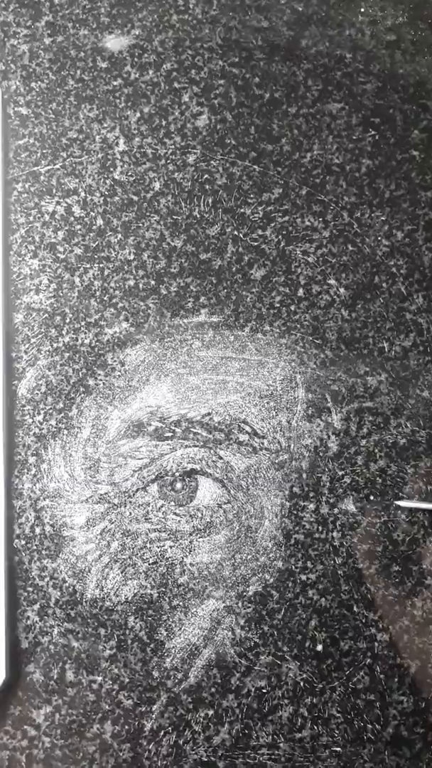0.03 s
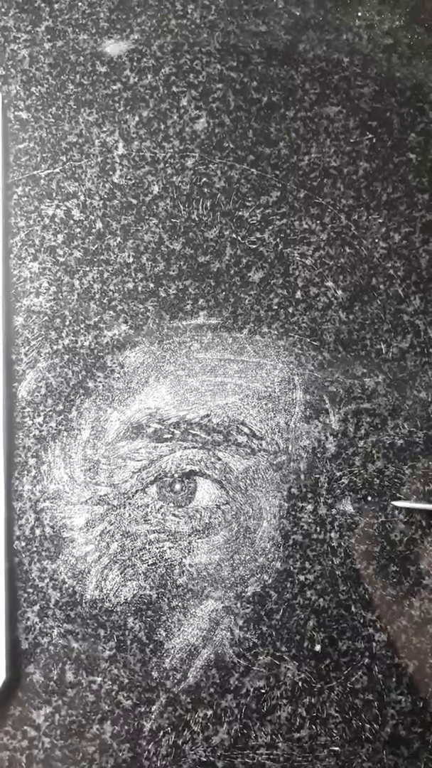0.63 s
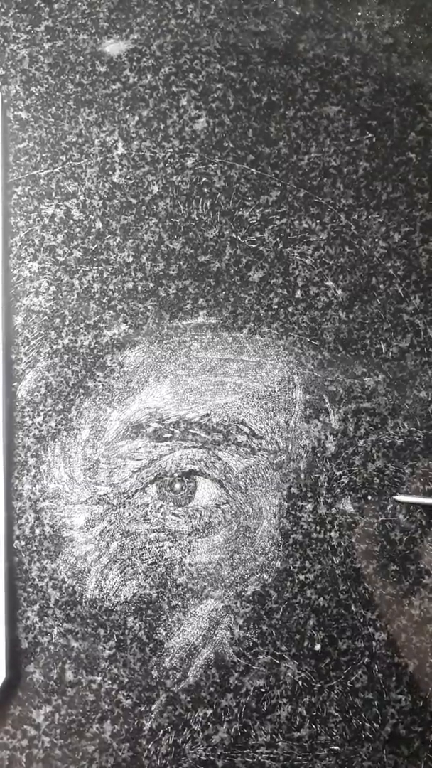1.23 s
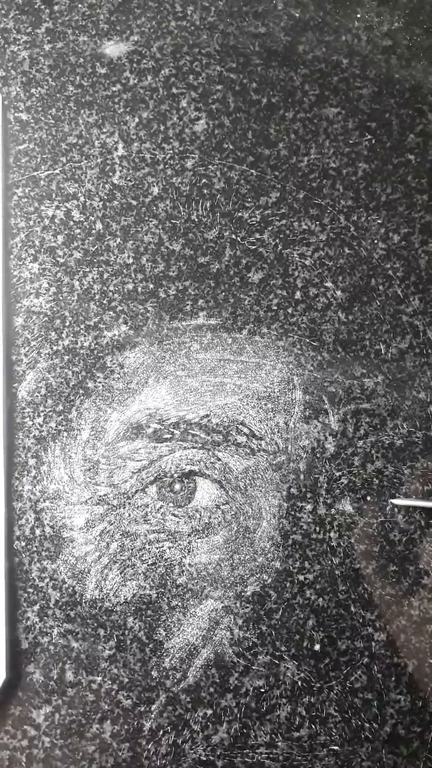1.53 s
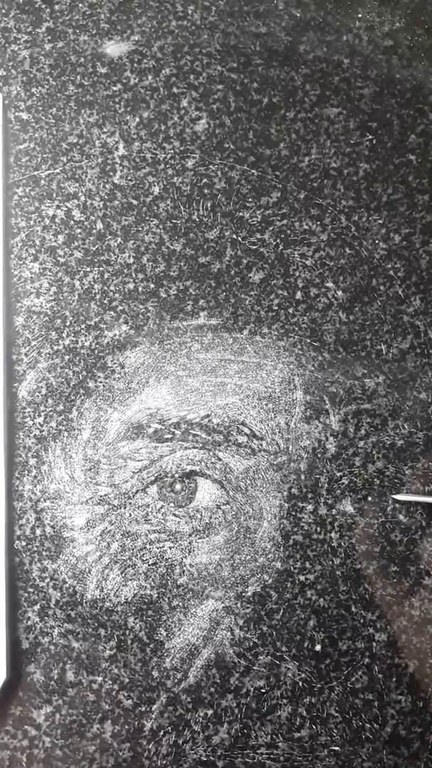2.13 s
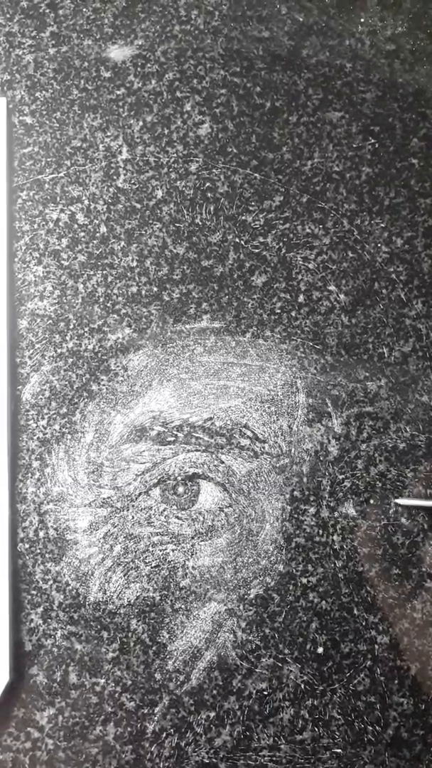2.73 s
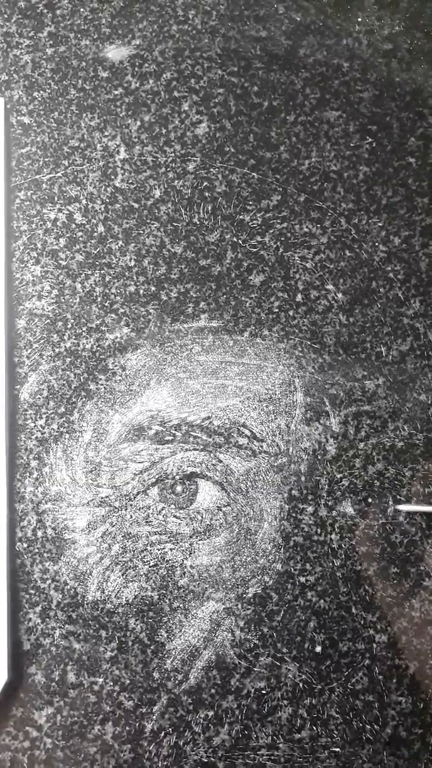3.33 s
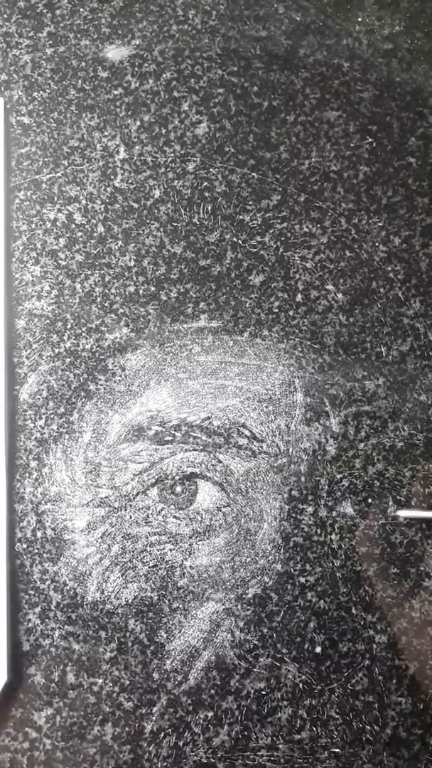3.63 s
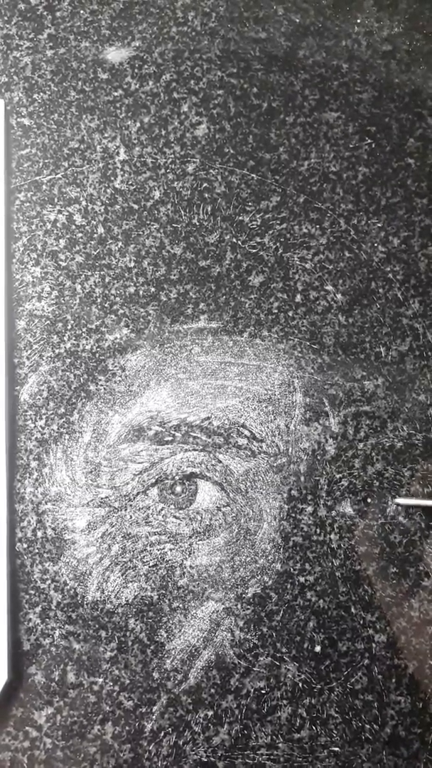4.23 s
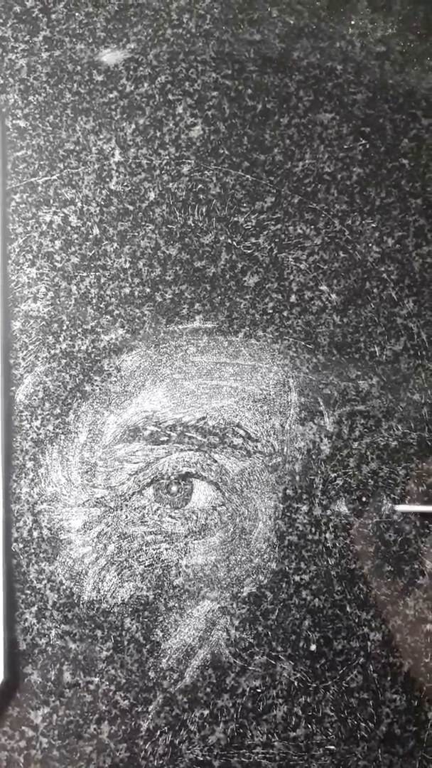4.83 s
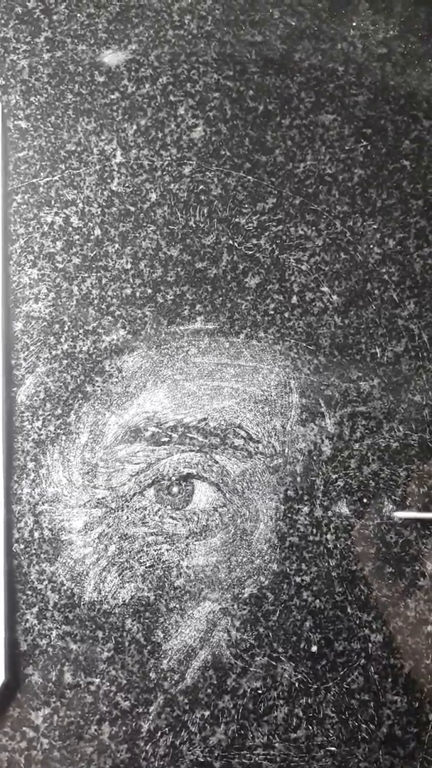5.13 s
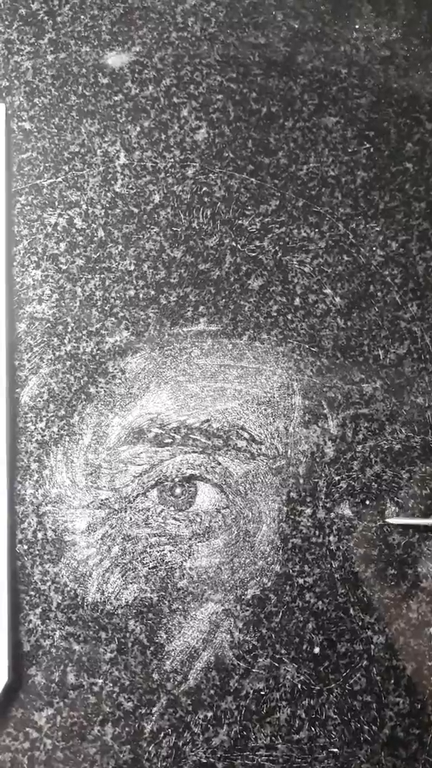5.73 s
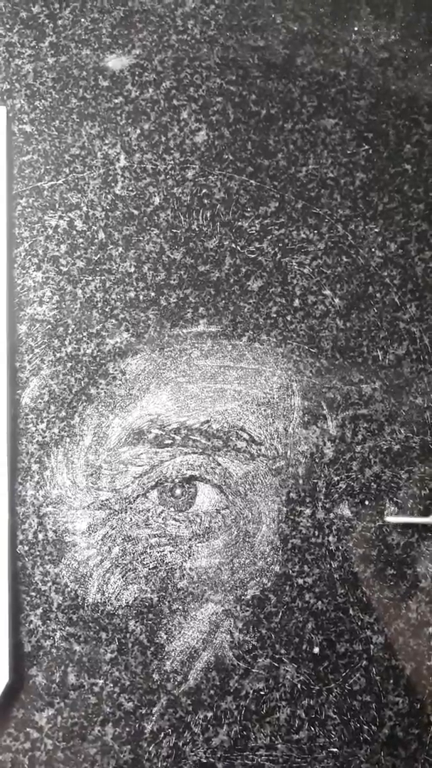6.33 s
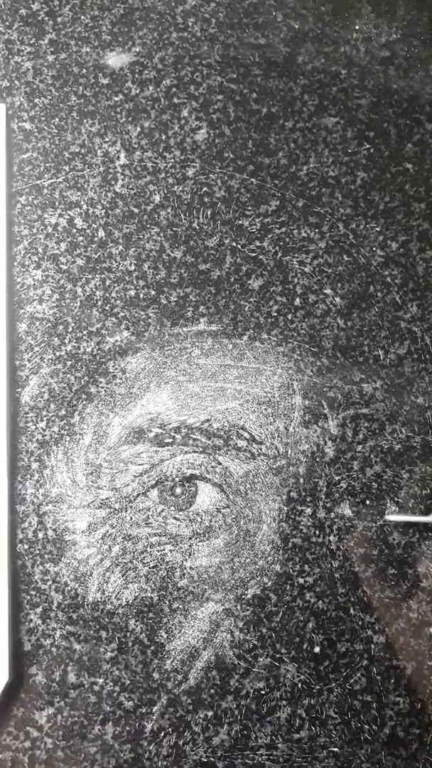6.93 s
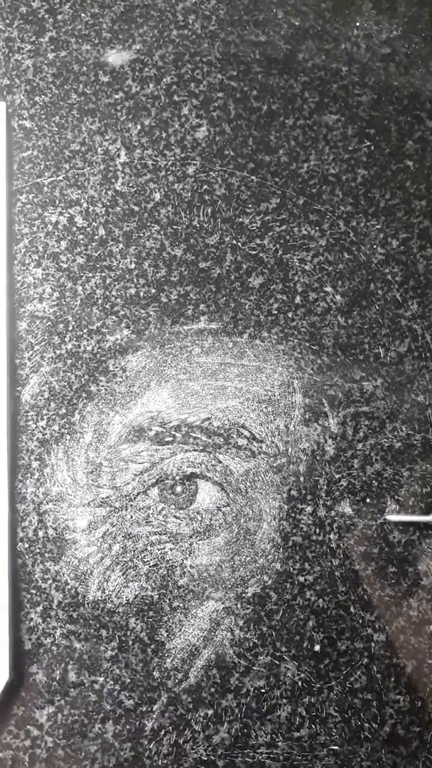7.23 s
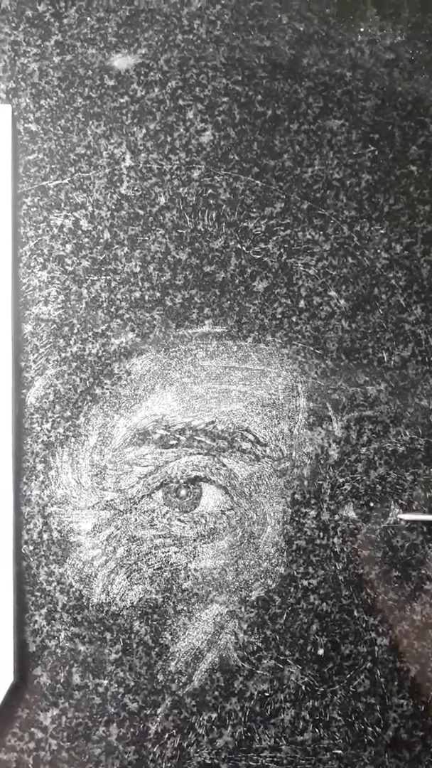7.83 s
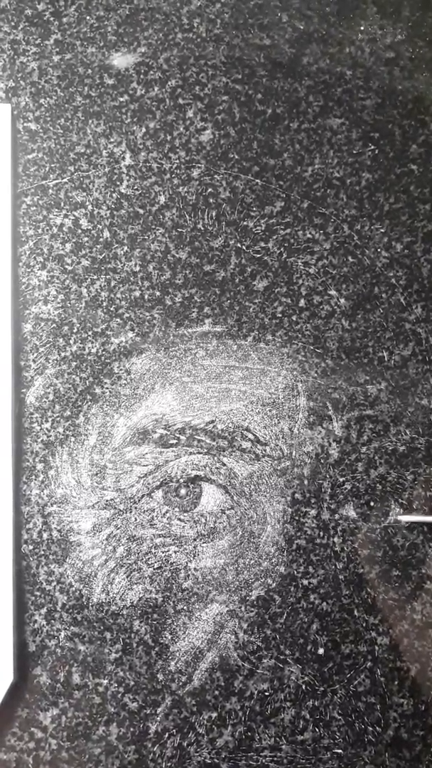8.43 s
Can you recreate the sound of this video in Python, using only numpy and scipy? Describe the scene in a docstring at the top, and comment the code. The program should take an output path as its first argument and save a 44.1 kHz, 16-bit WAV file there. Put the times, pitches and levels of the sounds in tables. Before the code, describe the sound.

A harsh, high metallic buzz from a small engraving tool continues at a steady pitch and nearly even loudness, close to the microphone. Short scratches come several times a second as the vibrating tip pecks at stone, then grow sparser and more uneven toward the end. Light chatter from the tool and a weak hum blend in, over faint noise in a small room.

```python
"""A hard metallic buzz, rasping in short scratches: an impact engraver stipples a stone slab in a small room.
Magnetic pull peaks twice per mains cycle, and each time the armature slams into its stop, exciting the
housing's resonances and setting loose parts chattering. The tip pecks the stone just before each slam,
louder as the hand presses. The coil hums, and brief reverberation fills the gaps over faint room noise."""
import sys
import numpy as np
from scipy import signal
from scipy.fft import rfft, irfft
from scipy.io import wavfile
from scipy.ndimage import uniform_filter1d

SR = 44100
rng = np.random.default_rng(int(sys.argv[2]) if len(sys.argv) > 2 else 0)


def wrap_up_sound(samples):
    """Save the sound to the file named by the first command line argument, as 16-bit audio."""
    columns = np.atleast_2d(samples).T
    # keep every value between -1 and 1, then stretch to whole-number steps
    tamed = np.clip(columns, -1, 1)
    steps = np.round(tamed * 32767).astype(np.int16)
    wavfile.write(sys.argv[1], SR, steps)


N = 377937

# Hum of coil and slab, by harmonic of the stroke rate. Each row: left and right level in dB at full
# transmission, share that travels through the tip (0-1), pressure at which that path is 76% open.
HUM_HARMONICS = [(-61, -60, 0.38, 0.57), (-58, -54, 1, 0.93), (-85, -50, 0.7, 0.28), (-92, -71.5, .4, .5),
                 (-82, -50.5, 0.83, 1.4), (-69, -56, 0, .5), (-73, -93, 0.6, .5), (-50, -51.5, 1, 1),
                 (-49.5, -50, 0.9, 0.38), (-66.5, -75, 0.8, .5), (-40, -39, 0.97, 1.8)]
# Swells of a faint tone at 2.5 times the stroke rate. Each row: start and length in seconds, level in dB.
HALF_ORDER_SWELLS = [(6.3, 0.47, -58), (7.05, 0.41, -56), (7.48, 0.49, -57)]
# Spectrum of the room noise. Each row: frequency in Hz, relative level in dB.
AIR_SPECTRUM = [(20, -4), (60, -3.5), (130, -5.5), (260, 1.5), (600, -9.5), (2000, 12.5), (16000, 0.5)]
# The hand pushing the tip onto the stone. Each row: start and length in seconds, pressure in dB.
PUSHES = [(.03, 0.1, -4), (.28, 0.082, -16.5), (.45, 0.38, -5.5), (.87, 0.12, -4), (1.06, 0.11, -4.5),
          (1.32, 0.072, -4.5), (1.5, 0.11, -4.5), (1.66, 0.13, -7.5), (1.92, 0.064, -13), (2.12, 0.09, -11),
          (2.31, .11, -7.5), (2.51, .13, -6.5), (2.77, 0.077, -2), (2.97, 0.095, -4.5), (3.14, 0.13, -3),
          (3.37, 0.13, -1.5), (3.55, 0.11, 1.5), (3.74, 0.11, -1), (3.96, 0.1, -1), (4.12, 0.11, 0.5),
          (4.32, 0.092, -2.5), (4.48, 0.078, 1.5), (4.65, 0.14, -0.5), (4.84, 0.13, 0.5), (5.06, .11, -2.5),
          (5.23, .12, -1.5), (5.49, 0.058, -9), (5.65, 0.2, -10), (5.93, .08, -17), (6.13, 0.17, -7),
          (6.44, 0.12, -11), (6.88, 0.2, -7.5), (7.2, 0.42, -6), (7.62, 0.097, 1), (8.08, 0.085, -4),
          (8.2, .16, -1), (8.45, .07, -7)]
# Weight of the hand between pushes. Each row: time in seconds, pressure in dB.
RESTING_PRESSURE = [(0, -18.5), (1, -17), (1.3, -22), (2.7, -19), (3, -10), (5.3, -10.5), (5.4, -20.5),
                    (6.2, -22), (6.8, -30), (7, -7.5), (7.7, -12), (7.8, -37), (8, -38), (8.3, -10),
                    (8.55, -20)]
# Spells of stronger limping, strokes early and late by turns. Each row: start and length in seconds,
# timing swing in dB above the usual.
LIMP_SPELLS = [(.16, 0.13, 12.5), (2.02, 0.13, 7), (5.84, 0.095, 14.5), (6.55, 0.27, 10), (7.75, 0.29, 8.5)]
# Response of the slab to the tip. Each row: frequency in Hz, left and right relative gain in dB.
STONE_SPECTRUM = [(69, -24, -35), (312, -21, -11), (710, -17, -21), (903, 1.5, -2.5), (1060, -2, 1.5),
                  (1400, 2, 7.5), (1510, 8, 3.5), (2160, -0.5, -2), (3220, -21, 4.5), (4570, 15, 3),
                  (7140, -2.5, 7), (7900, -23, -10), (10500, -18, -5.5), (16000, -40, -30)]
# Resonances of the housing. Each row: frequency and width in Hz, left and right relative gain in dB.
HOUSING_MODES = [(1007, 290, 8.5, -1), (1487, 424, -28, 12.5), (2617, 425, 19.5, 25.5),
                 (3550, 230, -5, 14.5), (4110, 1280, 17.5, 10), (5228, 612, 28.5, 13.5),
                 (5560, 230, 20.5, 14), (6570, 350, -23.5, 16), (7200, 330, -31, 12.5), (9620, 340, -6, 10),
                 (11230, 1200, 6, -21), (14000, 1100, -16, 2.5), (15400, 440, -14, 3)]
# Sizzle of loose metal. Each row: frequency in Hz, left and right relative gain in dB.
CHATTER_SPECTRUM = [(203, -43, -22), (1380, -5, 3.5), (2540, 8.5, -7.5), (4240, 9, 4), (5820, 6.5, 14),
                    (6070, -7, 11), (8300, -3, -4), (9400, -2, -2.5), (9600, 0, -10), (10600, -2.5, -12),
                    (11600, 0, 2.5), (12700, -5.5, -1), (15000, 0, -13), (15700, 1.5, -16)]
# Spectrum of the reverberation. Each row: frequency in Hz, relative gain in dB.
ROOM_SPECTRUM = [(100, -24), (500, -27.5), (900, -6), (1400, -5), (2100, -9), (2650, 7.5), (3200, -0.5),
                 (4300, 3), (5000, 0.5), (6500, -8.5), (8200, -19.5), (11500, -15), (14500, -15),
                 (16000, -14)]

STROKE_HZ, FIRST_SLAM_S = 100.0476, .0091
PRESS_S, LIFT_S = 0.042, 0.046  # the hand bears down, and lets go
TOP_HZ, FFT_SIZE = 15850, 2048
FREQS = np.maximum(np.fft.rfftfreq(FFT_SIZE, 1 / SR), 1)


def undb(db):
    """Amplitude grows tenfold for every 20 dB."""
    return 10 ** (np.asarray(db) / 20)


def level(x, db):
    """Normalisation to an rms level in dB."""
    return x * undb(db) / np.sqrt(np.mean(x ** 2))


def colour(table, column=1):
    """A spectral envelope: gain interpolated in dB over log frequency."""
    rows = np.array(table)
    return undb(np.interp(np.log(FREQS), np.log(rows[:, 0]), rows[:, column]))


def ring(x, gain, smear_s=0):
    """Minimum-phase filtering with dispersion: the added delay grows to `smear_s` at TOP_HZ."""
    cepstrum = irfft(np.log(gain + 1e-6))
    cepstrum[1:FFT_SIZE // 2] *= 2
    cepstrum[FFT_SIZE // 2 + 1:] = 0
    phase_lag = np.pi * smear_s * FREQS ** 2 / TOP_HZ
    response = irfft(np.exp(rfft(cepstrum) - 1j * phase_lag))
    return signal.oaconvolve(x, response)[:N]


def clicks(times, size, order=8):
    """Band-limited impulses: a windowed sinc places each between samples."""
    at = np.ravel(times)[:, None] * SR
    taps = np.floor(at).astype(int) + np.arange(1 - order, order + 1)
    shape = np.sinc(taps - at) * np.cos(np.pi / 2 * (taps - at) / order) ** 2
    inside = (taps >= 0) & (taps < N)
    return np.bincount(taps[inside], (np.ravel(size)[:, None] * shape)[inside], N)


def wander(strokes, span):
    """Random drift of unit rms, correlated over about `span` strokes."""
    noise = rng.standard_normal(len(strokes))
    return level(uniform_filter1d(uniform_filter1d(noise, span), span), 0)


def swells(table, t, attack_s, release_s):
    """Superposed envelopes that rise, hold and fall, with ramps centred on their edges."""
    ramp = lambda x: np.clip(.5 + x, 0, 1)
    return sum(undb(db) * ramp((t - start) / attack_s) * ramp((start + length - t) / release_s)
               for start, length, db in table)


def pressure(t):
    """Contact load on the tip: the greater of push and resting weight, 1 being a firm push."""
    resting_db = np.interp(t, *np.transpose(RESTING_PRESSURE))
    return np.maximum(swells(PUSHES, t, PRESS_S, LIFT_S), undb(resting_db))


def hum(strokes, waver_db=0.62, fade_s=.12):
    """Forced vibration: the coil shakes at mains harmonics, and the pressed tip couples it to the slab."""
    t = np.arange(N) / SR
    cycles = STROKE_HZ * t
    press = pressure(t)
    half_order = swells(HALF_ORDER_SWELLS, t, fade_s, fade_s) * np.sin(2 * np.pi * 2.5 * cycles)
    tones = undb([[-9], [0]]) * half_order  # weaker on the left
    for k, (left_db, right_db, share, firm) in enumerate(HUM_HARMONICS, 1):
        drift_db = np.interp(t, strokes, wander(strokes, span=10)) * waver_db * np.log2(2 * k)
        # higher tones reach the two microphones further out of step
        offset = rng.random() + np.array([[0], [min(k, 5) / 18]])
        tone = np.sin(2 * np.pi * (k * cycles + offset))
        transmission = 1 - share * (1 - np.tanh(press / firm))
        tones += undb([[left_db], [right_db]]) * tone * undb(drift_db) * transmission
    return np.sqrt(2) * tones


def air():
    """Ambient noise is partly coherent: both microphones share most of it."""
    noise = rng.standard_normal(N) + 0.4 * rng.standard_normal((2, N))
    return np.array([ring(side, colour(AIR_SPECTRUM)) for side in noise])


def stroke_times(free_delay_ms=.2, advance_ms=0.427, limp_ms=.033, jitter_ms=0.039, tremor_ms=0.06):
    """Driven oscillation: a slam every half cycle of the mains, sooner under load, never quite even."""
    k = np.arange(int(N / SR * STROKE_HZ) + 1)
    beats = FIRST_SLAM_S + k / STROKE_HZ
    limp = (-1) ** k * limp_ms * np.maximum(swells(LIMP_SPELLS, beats, PRESS_S, LIFT_S), 1)
    unsteady = jitter_ms * rng.standard_normal(len(beats)) + tremor_ms * wander(beats, span=5)
    late_ms = free_delay_ms - advance_ms * np.sqrt(pressure(beats)) + limp + unsteady
    return beats + late_ms / 1000


def tip(strokes, lead_s=.0024, press_lead_s=0.000615, jitter_s=.00005, grit=0.39, grit_s=.0011, chips=8):
    """Impact and brittle fracture: the tip meets the stone, sooner when pressed, and chips crackle off."""
    contact = pressure(strokes)
    at = strokes - lead_s - press_lead_s * contact + jitter_s * rng.standard_normal(len(strokes))
    size = np.tanh(contact) * undb(1.5 * rng.standard_normal(len(strokes)))
    chip_wait = grit_s * rng.exponential(size=(len(strokes), chips))
    chip_size = grit * size[:, None] * rng.standard_normal(chip_wait.shape)
    return clicks(at, size) + clicks(at[:, None] + chip_wait, chip_size)


def armature(strokes, rebound_s=0.001529, rebound_drift_s=.00006, rebound_db=-12):
    """Inelastic collision: each slam on the stop is followed by one weaker, less regular rebound."""
    size = undb(.35 * rng.standard_normal(len(strokes)))
    rebound_at = strokes + rebound_s + rebound_drift_s * wander(strokes, span=2)
    rebound_size = size * undb(rebound_db + 2.6 * wander(strokes, span=2))
    return clicks(strokes, size) + clicks(rebound_at, rebound_size)


def housing(column):
    """Modal response towards one microphone: the housing's steep resonances add in power."""
    power = 0
    for mode in HOUSING_MODES:
        hz, width_hz = mode[:2]
        detuning = (FREQS ** 2 - hz ** 2) / (FREQS * width_hz)
        power += undb(mode[column]) ** 2 / (1 + detuning ** 2) ** 2
    return np.sqrt(power)


def chatter(strokes, rise_s=0.0011, decay_s=0.0012, scatter_db=1.2):
    """Countless tiny contacts of loose parts sum to noise that decays exponentially after each slam."""
    t = np.arange(SR // 50) / SR
    settling = (1 - np.exp(-t / rise_s)) * np.exp(-t / decay_s)
    jolts = clicks(strokes, undb(scatter_db * rng.standard_normal(len(strokes))))
    envelope = signal.oaconvolve(jolts, settling)[:N]
    return envelope * (rng.standard_normal(N) + 1.37 * rng.standard_normal((2, N)))


def workshop(impacts, strokes, t60_s=0.34, first_echo_s=0.0017, sway_rad=0.58):
    """Reverberation: dense reflections decay exponentially, their pattern shifting as the hand moves."""
    t = np.arange(SR // 2) / SR
    decay = np.exp(-np.log(1000) * t / t60_s) * (t > first_echo_s)
    tails = rng.standard_normal((2, 2, len(t))) * decay
    sent = ring(impacts, colour(ROOM_SPECTRUM))
    here, there = (np.array([signal.oaconvolve(sent, tail)[:N] for tail in pair]) for pair in tails)
    blend = sway_rad * np.interp(np.arange(N) / SR, strokes, wander(strokes, span=40))
    return np.cos(blend) * here + np.sin(blend) * there


def ring_flutter(x, strokes, band_hz=(2250, 3000), dip_db=1.4, flutter_db=0.74):
    """Amplitude modulation: the 2.6 kHz ring flutters at random and dips as the hand presses."""
    band = signal.sosfiltfilt(signal.butter(2, band_hz, "band", fs=SR, output="sos"), x)
    swell_db = flutter_db * wander(strokes, span=3) - dip_db * pressure(strokes)
    gain = undb(np.interp(np.arange(N) / SR, strokes, swell_db - swell_db.mean()))
    return x + band * (gain - 1)


def path_delay(x, lag_s=0.00036):
    """Travel time: the right microphone lies farther from the tool and hears it later."""
    shift = np.exp(-2j * np.pi * np.fft.rfftfreq(2 * N, 1 / SR) * lag_s)
    return np.array([x[0], irfft(rfft(x[1], 2 * N) * shift)[:N]])


def scene():
    """Superposition: ringing housing, chatter, stone and reverberation add to the hum and room noise."""
    strokes = stroke_times()
    slams, rattle, pecks = armature(strokes), chatter(strokes), tip(strokes)
    stone = np.array([ring(pecks, colour(STONE_SPECTRUM, column=1), smear_s=0.00015),
                      ring(pecks, colour(STONE_SPECTRUM, column=2), smear_s=0.000693)])
    tool = np.array([ring(slams, housing(column=2), smear_s=0.00068),
                     ring(slams, housing(column=3), smear_s=0.00056)])
    sizzle = np.array([ring(rattle[0], colour(CHATTER_SPECTRUM, column=1)),
                       ring(rattle[1], colour(CHATTER_SPECTRUM, column=2))])
    room = workshop(slams + 0.52 * pecks, strokes)
    ringing = ring_flutter(level(path_delay(tool), -18.5) + level(room, -28.0), strokes)
    buzz = ringing + level(path_delay(sizzle), -27.0)
    return buzz + level(stone, -32) + hum(strokes) + level(air(), -40)


def record(dry, low_cut_hz=55):
    """Band limiting: the microphones thin the deep bass and cut off steeply above TOP_HZ."""
    thin = signal.sosfilt(signal.butter(2, low_cut_hz, "high", fs=SR, output="sos"), dry)
    return signal.sosfilt(signal.ellip(12, .1, 80, TOP_HZ, fs=SR, output="sos"), thin)


dry = scene()
out = record(dry)
wrap_up_sound(out)
```